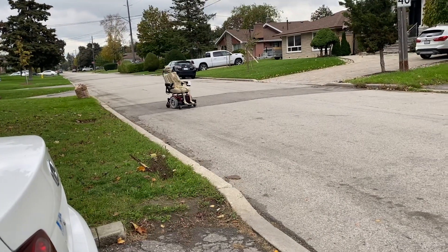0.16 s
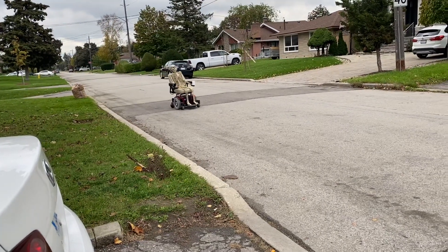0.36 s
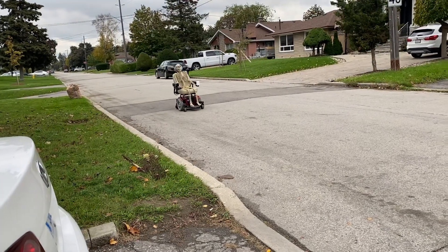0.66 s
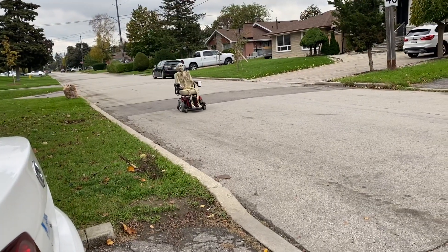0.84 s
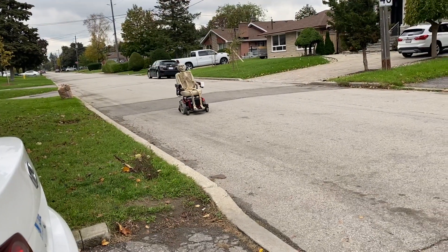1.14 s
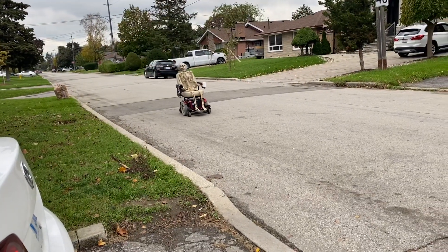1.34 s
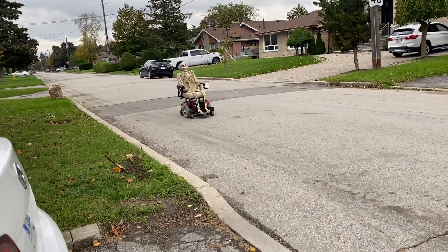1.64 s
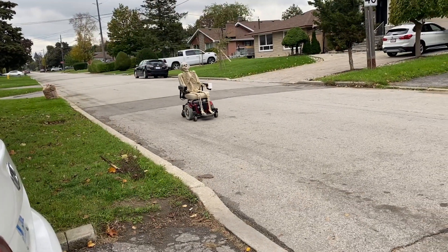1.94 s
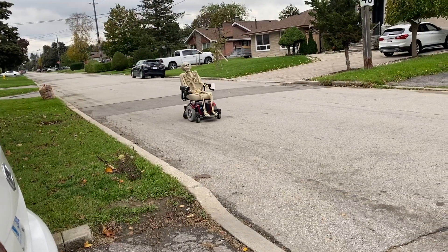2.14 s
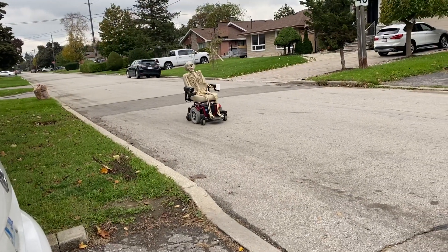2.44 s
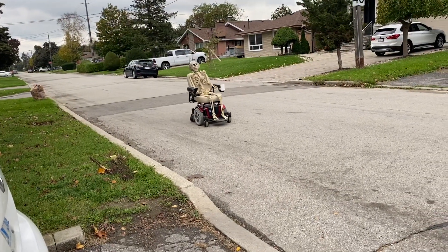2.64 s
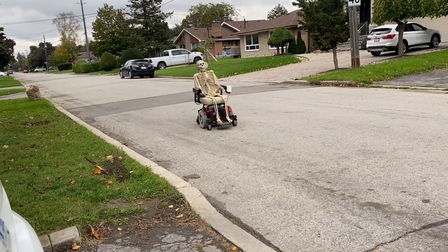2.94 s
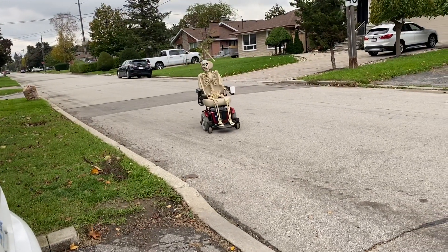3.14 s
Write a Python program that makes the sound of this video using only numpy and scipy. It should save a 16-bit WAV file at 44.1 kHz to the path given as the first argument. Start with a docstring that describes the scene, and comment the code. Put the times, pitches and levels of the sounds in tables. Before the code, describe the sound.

Quiet suburban street ambience in light wind, captured by a handheld stereo microphone: early wind thumps, two small clusters of handling taps and knocks, then smoother air as a powered wheelchair's faint tyre hiss slowly nears.

```python
"""A steady wash of distant traffic and leaves over a low rumble, on a quiet residential street in light wind.
The faint tyre hiss of a powered wheelchair slowly nears; wash and hiss are shaped noise with blurred echoes.
Wind thumps the microphone, mostly in the first second: short swings of pressure under fluttering noise.
Faint taps and duller knocks come from handling the camera: small blows that ring resonances of its case."""
import sys
import numpy as np
from scipy import signal
from scipy.fft import rfft, irfft
from scipy.io import wavfile
from scipy.ndimage import uniform_filter1d

SR = 44100
rng = np.random.default_rng(int(sys.argv[2]) if len(sys.argv) > 2 else 0)


def output_pcm(signal):
    """Save a mono or channel-first signal as 16-bit PCM at the path in sys.argv[1].

    Samples are clipped to [-1, 1] before scaling.
    """
    pcm = np.clip(np.atleast_2d(signal).T, -1, 1) * 32767
    wavfile.write(sys.argv[1], SR, np.round(pcm).astype(np.int16))


N = 145089
# time of each sample in seconds, frequency of each spectral bin in Hz
T, HZ = np.arange(N) / SR, np.fft.rfftfreq(N, 1 / SR)

# Likeness of the two channels. Each row: frequency in Hz, likeness (later held within 0 to 1).
CHANNEL_LIKENESS = [(100, 0.8), (230, 0.54), (450, 0.73), (650, 0.32), (1500, 0.83), (2100, 0.24),
                    (2700, .5), (3500, -0.28), (5000, 0.7), (7500, -0.1), (8500, 3), (13000, 56)]
# Phase between the channels; the treble flips in and out of opposite phase.
# Each row: frequency in Hz, phase of left relative to right in radians.
CHANNEL_PHASE = [(100, 0), (350, -.3), (500, -2), (800, -2.4), (1100, -3.1), (1900, -2.6), (2400, 0),
                 (2900, .7), (5200, .8), (5800, -.9), (7000, -.4), (8100, -3), (8800, -3.2), (10300, -6.2),
                 (11700, -6.4), (12800, -9.3), (14200, -9.5), (15200, -12.5)]
# Stereo balance of the street. Each row: frequency in Hz, left minus right in dB.
STREET_BALANCE = [(100, 1), (800, -0.5), (2500, -0.5), (5500, 4.5), (8500, 0.5)]
# Echoes from down the street: their summed level, and the longest delay
ECHO_DB, ECHO_S = -12.5, .045

# Colour of distant traffic and leaves. Each row: frequency in Hz, relative density in dB per Hz.
WASH_SPECTRUM = [(40, -3.5), (130, 6.5), (300, -1.5), (500, -1.5), (850, -1), (1150, -3), (1500, -9),
                 (2100, -15.5), (2700, -15.5), (3300, -17.5), (3800, -17.5), (5100, -21.5), (5550, -24.5),
                 (6200, -23.5), (8000, -29), (11500, -33.5), (13500, -51), (16000, -69)]
# Slow course of the wash. Each row: time in seconds, level in dB relative to WASH_DB.
WASH_COURSE = [(0, 2.5), (1.0, 2), (1.5, 1), (3.29, 2.5)]
WASH_DB, PATCH_DB = -47.5, 1.41  # base level, and rms unevenness across bands and time

# Colour of tyres on asphalt. Each row: frequency in Hz, relative density in dB per Hz.
TYRE_SPECTRUM = [(1000, 4), (2700, 2), (5100, 1.5), (5550, 1), (6300, 2), (9000, 0.5), (11700, -5.5),
                 (13500, -1.5), (16000, -46)]
# Approach of the tyres. Each row: time in seconds, level in dB.
TYRE_APPROACH = [(0, -68), (1.3, -62.5), (2.0, -61), (2.9, -58), (3.29, -58.5)]

# Colour of the low rumble. Each row: frequency in Hz, relative density in dB per Hz.
RUMBLE_SPECTRUM = [(20, -54), (32, -16), (45, 8), (68, 8.5), (95, 7.5), (130, 1), (165, -21), (300, -44.5)]
# Course of the rumble. Each row: time in seconds, level in dB.
RUMBLE_COURSE = [(0, -42.5), (.25, -47.5), (.3, -50.5), (.42, -46), (.52, -44), (.6, -50), (.8, -42),
                 (.88, -50), (1.03, -45), (1.3, -48), (1.9, -47.5), (2.2, -46.5), (2.45, -45.5), (2.6, -45),
                 (2.9, -42.5), (3.29, -43.5)]
STEADY_HZ, STEADY_SHARE = 17, 0.69  # power surges slower than about this are evened out, by this exponent
HUM_HZ, HUM_DB, HUM_WAVER = 135.8, -51, 0.015  # pitch, peak level, rms waver as a fraction of the pitch

# Resonances excited by taps. Each row: frequency in Hz, width in Hz, level in dB before the tap's treble.
TAP_RESONANCES = [(2730, 430, -7), (3800, 274, 2.5), (4270, 960, -10.5), (6340, 690, -11), (9600, 660, -14),
                  (12000, 880, -19.5)]
# Taps on the camera. Each row: start in seconds, level in dB, scrape in seconds, treble boost in dB.
TAP_EVENTS = [(.505, -55, .002, -10), (.521, -47, 0.0015, -18), (0.5299, -41.5, 0.0011, -3.5),
              (0.5327, -42.5, .0025, -4), (.6428, -51.5, 0.0036, 4), (0.715, -49, 0.0073, -7),
              (.8768, -47.5, 0.0015, 8), (0.8794, -43.5, 0.0048, -0.5), (0.906, -51, 0.0033, 2),
              (0.9102, -45.5, 0.0049, -5)]
TREBLE_HZ, TAP_GRIT, TAP_SOFT_HZ, TAP_PAN_DB = 5500, 2.5, 16000, 2.5

# Low resonances of the case. Each row: frequency in Hz, width in Hz, level in dB before the knock's boost.
CASE_RESONANCES = [(351, 74, 2), (780, 110, -3.5), (1173, 81, 2.5)]
# Grip knocks. Each row: start in seconds, level in dB, scrape in seconds, boost of upper resonances in dB.
KNOCK_EVENTS = [(.533, -36, 0.0047, -25), (0.5419, -39, 0.0077, -14), (.878, -41, 0.0097, -7),
                (0.8941, -36, .006, -6), (.9065, -35.5, 0.0073, -1), (.920, -42, 0.0039, 2),
                (.930, -37.5, 0.0043, -12)]
UPPER_HZ, KNOCK_GRIT, KNOCK_SOFT_HZ = 550, 2.4, 1540

GRAINS_PER_S, MODE_SPREAD = 2500, 0.018  # density of tiny slips, and detuning scale of the resonances
BLOW_S = .005  # span in seconds over which a blow's level is reckoned

# Wind buffets. Each row: crest in seconds, half length in seconds, level in dB, centre frequency in Hz.
BUFFET_EVENTS = [(.029, 0.0066, -31.5, 170.7), (0.063, 0.0054, -40.5, 200), (0.078, 0.014, -37, 78),
                 (0.127, 0.0053, -38, 135), (0.146, 0.0046, -29, 130), (0.177, 0.0084, -31.5, 122),
                 (0.189, 0.012, -33.5, 80), (0.338, .007, -38.5, 180), (.708, .016, -39, 85),
                 (0.733, 0.015, -33.5, 125), (0.757, 0.0048, -31, 112), (0.789, 0.041, -42, 64),
                 (.821, 0.01, -39, 140), (.842, .008, -38.5, 125), (1.151, 0.0072, -33, 115),
                 (1.176, 0.021, -36.5, 68), (1.287, 0.0062, -34.5, 165), (2.016, 0.014, -38, 108),
                 (2.175, 0.014, -39.5, 95), (2.322, 0.041, -40, 69), (2.8, 0.024, -37.5, 66.3),
                 (3.007, 0.016, -38.5, 72)]
BUFFET_OCTAVES, BUFFET_SAG_OCTAVES = 0.1968, .3  # random pitch wobble (rms), and fall either side of the crest
BUFFET_OVERTONE_DB = -15
# Colour of the turbulence. Each row: frequency in Hz, relative density in dB per Hz.
FLUTTER_SPECTRUM = [(100, -11), (190, 0.5), (245, 4), (300, -5), (420, -11), (700, -28), (1500, -51.5)]
# Course of the turbulence. Each row: time in seconds, level in dB.
FLUTTER_COURSE = [(0, -60), (.16, -47), (.24, -55), (.55, -52), (.66, -55.5), (.735, -43), (.79, -45.5),
                  (.835, -46), (.88, -63), (1.15, -64), (1.4, -68)]

EDGE_HZ = 15800


def amp(db):
    """Decibels to gain."""
    return 10 ** (np.asarray(db) / 20)


def unit(x):
    """Scales to rms 1."""
    return x / np.sqrt(np.mean(x ** 2) + 1e-20)


def read(points):
    """A table over frequency, joined on a log axis."""
    f, value = np.transpose(points)
    return np.interp(np.log(HZ + 1), np.log(f + 1), value)


def level(points):
    """Gain along a curve of seconds and dB."""
    return amp(np.interp(T, *np.transpose(points)))


def white():
    """A random flat spectrum."""
    return rng.standard_normal(len(HZ)) + 1j * rng.standard_normal(len(HZ))


def drift(rate_hz):
    """Random motion of rms 1, mostly slower than rate_hz."""
    return unit(irfft(white() * np.exp(-(HZ / rate_hz) ** 2) * (HZ > 0), N))


def noise(gain, same, phase=0):
    """Coloured noise in two channels, partly alike, with a phase of left relative to right; rms 1 overall."""
    shared = np.clip(same, 0, 1)
    left = white()
    right = shared * left + np.sqrt(1 - shared ** 2) * white()
    right = right * np.exp(-1j * phase)
    return unit(irfft(np.array([left, right]) * gain, N))


def pan(db):
    """Left and right gains for a level difference."""
    return amp(np.array([[.5], [-.5]]) * db)


def far(spectrum):
    """Noise from down the street: echoes off houses and cars comb its colour, in two partly alike channels."""
    delays = rng.uniform(.1, 1, 8) * ECHO_S
    reflections = np.exp(-2j * np.pi * delays[:, None] * HZ).sum(0) / np.sqrt(len(delays))
    comb = abs(1 + amp(ECHO_DB) * reflections)
    colour = amp(read(spectrum)) * comb * pan(read(STREET_BALANCE))
    return noise(colour, read(CHANNEL_LIKENESS), read(CHANNEL_PHASE))


def street():
    """Distant traffic and leaves, with slight random unevenness across bands and time."""
    _, _, bands = signal.stft(far(WASH_SPECTRUM), SR, nperseg=512, noverlap=384)
    # random gains smoothed over neighbouring bands, then over time
    patches = uniform_filter1d(rng.standard_normal(bands.shape[1:]), size=6, axis=0)
    patches = unit(uniform_filter1d(patches, size=24, axis=1))
    uneven = bands * amp(PATCH_DB * patches)
    wash = signal.istft(uneven, SR, nperseg=512, noverlap=384)[1][:, :N]
    return wash * level(WASH_COURSE) * amp(WASH_DB + 0.38 * drift(rate_hz=54))


def tyres():
    """Small wheels on asphalt: a hiss that grows as they near, made gritty by quick level flutter."""
    return far(TYRE_SPECTRUM) * level(TYRE_APPROACH) * amp(1.3 * drift(rate_hz=140))


def rumble():
    """Low wind noise with its slow power surges evened out, plus a faint hum of wavering pitch and level."""
    turns = np.cumsum(HUM_HZ * (1 + HUM_WAVER * drift(rate_hz=7.1))) / SR
    hum = amp(HUM_DB + 0.71 * drift(rate_hz=0.93)) * np.sin(2 * np.pi * turns)
    air = noise(amp(read(RUMBLE_SPECTRUM)), same=0.92)
    power = (air ** 2).mean(0)
    surge = abs(irfft(rfft(power) * np.exp(-(HZ / STEADY_HZ) ** 2), N)) + 1e-6
    steady_air = unit(air / surge ** (STEADY_SHARE / 2))
    return steady_air * level(RUMBLE_COURSE) + hum


def blow(start, scrape, grit, soft_hz, modes, split_hz, upper_db):
    """A snap and a dying scatter of tiny slips ring slightly detuned resonances; rms 1 over BLOW_S."""
    grains = rng.standard_normal((2, N)) * (rng.random((2, N)) < GRAINS_PER_S / SR)
    slips = grains * (T >= start) * np.exp(-abs(T - start) / scrape)
    slips = unit(slips) / np.sqrt(N)  # bring to the scale of the snap
    snap = np.exp(-2j * np.pi * HZ * start)
    force = snap + grit * rfft(slips)
    detune = 1 + MODE_SPREAD * rng.uniform(-1.3, 1, len(modes))
    body = 0
    for k, (hz, width, db) in enumerate(modes):
        gain = (-1) ** k * amp(db + upper_db * (hz > split_hz))  # neighbours alternate in sign
        damping = width * HZ
        body = body + gain * damping / (damping + 1j * (HZ ** 2 - (hz * detune[k]) ** 2))
    softness = 1 / (1 + (HZ / soft_hz) ** 6)  # a soft contact loses treble
    return unit(irfft(force * softness * body, N)) * np.sqrt(BLOW_S * SR / N)


def taps():
    """Sharp contacts, some in quick pairs, ring the case most near 3.8 kHz and die within milliseconds."""
    contacts = 0
    for start, db, scrape, treble_db in TAP_EVENTS:
        ring = blow(start, scrape, TAP_GRIT, TAP_SOFT_HZ, TAP_RESONANCES, TREBLE_HZ, treble_db)
        contacts = contacts + amp(db) * ring
    return pan(TAP_PAN_DB) * contacts


def knocks():
    """The grip shifts in small jolts that ring the low resonances of the case."""
    jolts = 0
    for start, db, scrape, upper_db in KNOCK_EVENTS:
        ring = blow(start, scrape, KNOCK_GRIT, KNOCK_SOFT_HZ, CASE_RESONANCES, UPPER_HZ, upper_db)
        jolts = jolts + amp(db) * ring
    return jolts


def buffets():
    """Each eddy thumps in a few lopsided pressure swings that slow as it passes, with turbulence above."""
    out = noise(amp(read(FLUTTER_SPECTRUM)), same=0.66) * level(FLUTTER_COURSE)
    wobble = drift(rate_hz=150)
    for crest, half, db, hz in BUFFET_EVENTS:
        age = (T - crest) / half
        octaves = BUFFET_OCTAVES * wobble - BUFFET_SAG_OCTAVES * np.tanh(age)
        turns = np.cumsum(hz * 2 ** octaves) / SR + rng.random()
        overtone = amp(BUFFET_OVERTONE_DB) * np.sin(2 * np.pi * 2 * turns)
        swings = np.sin(2 * np.pi * turns) + overtone
        out += amp(db) * np.exp(-age ** 2) * np.sqrt(2) * swings
    return out


def scene():
    """Street, wheels, wind and handling together."""
    return street() + tyres() + rumble() + taps() + knocks() + buffets()


def record(dry):
    """A steep low-pass filter removes the highest treble."""
    lowpass = signal.firwin(511, EDGE_HZ, window=("kaiser", 9), fs=SR)
    return signal.oaconvolve(dry, lowpass[None], "same")


dry = scene()
out = record(dry)
output_pcm(out)
```